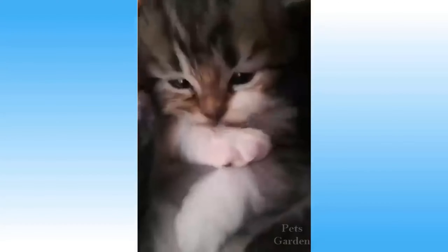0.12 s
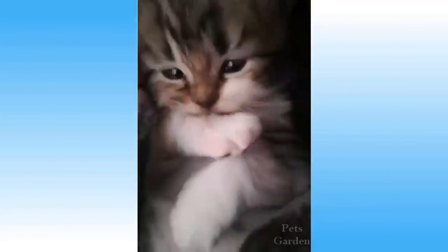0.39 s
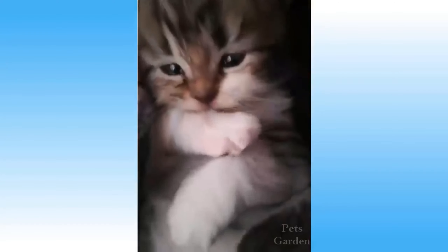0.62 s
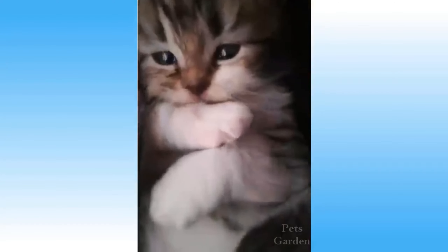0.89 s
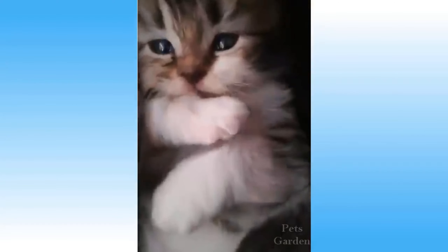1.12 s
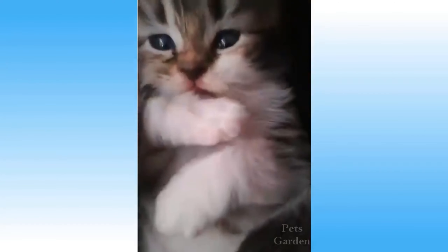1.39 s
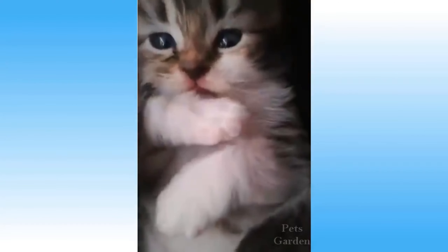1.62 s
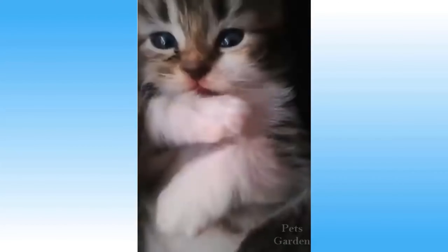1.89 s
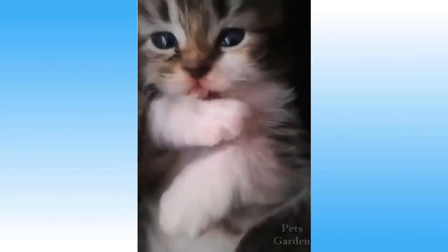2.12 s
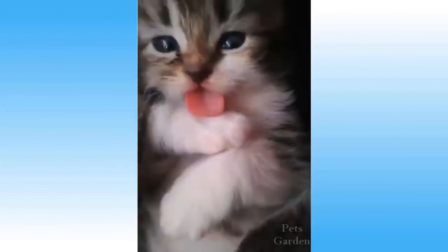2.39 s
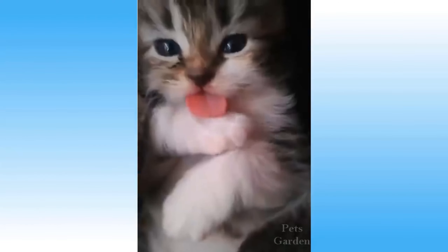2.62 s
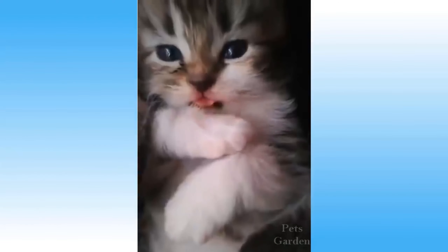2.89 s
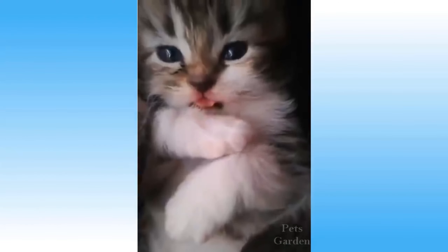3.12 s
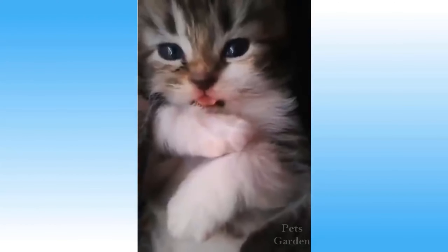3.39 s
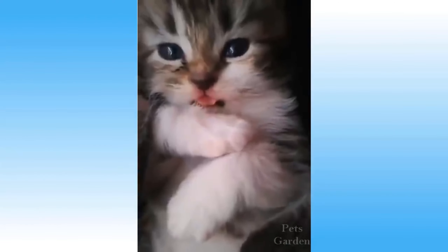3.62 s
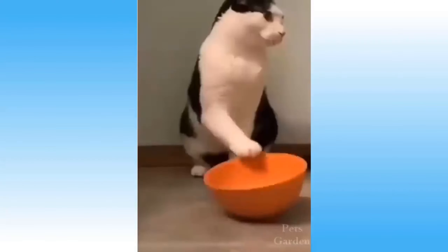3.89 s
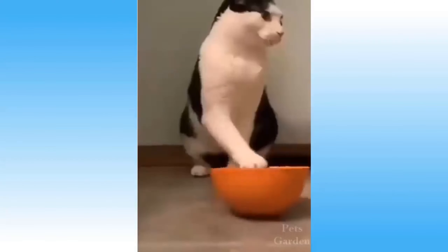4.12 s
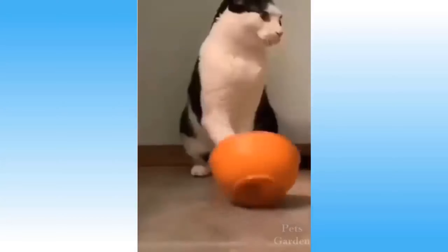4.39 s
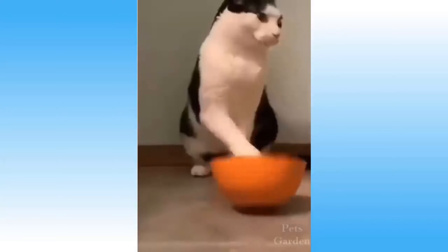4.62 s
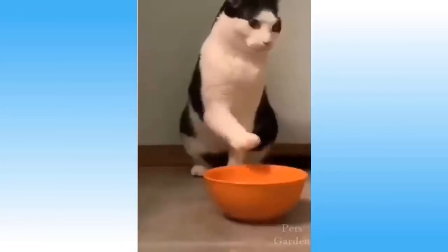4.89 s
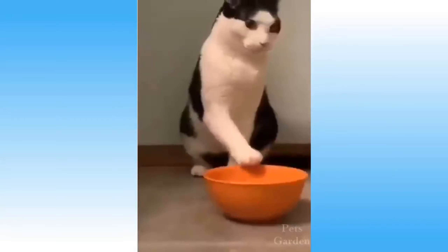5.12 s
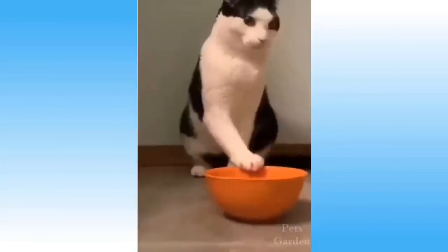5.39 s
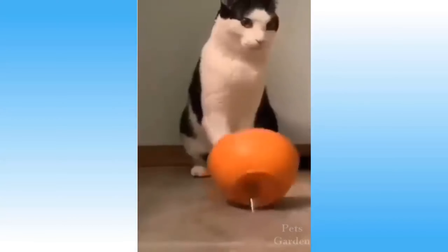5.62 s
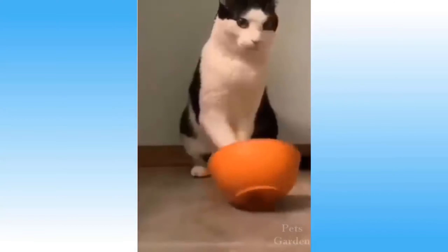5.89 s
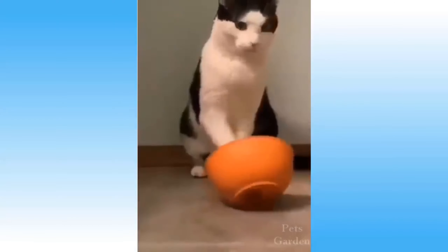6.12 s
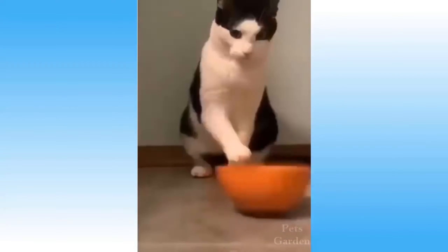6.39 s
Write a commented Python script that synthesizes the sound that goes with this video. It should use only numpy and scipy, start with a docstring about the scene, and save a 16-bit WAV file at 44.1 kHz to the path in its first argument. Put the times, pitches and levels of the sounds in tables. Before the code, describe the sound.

Close wet licks click over low room rumble and hiss, then after a brief silence a hollow plastic bowl scrapes, knocks and slams on a floor.

```python
"""Indoors, a quiet room and then a small bare one: two short scenes separated by a moment of silence.
First a kitten held close licks its lips: brief cavity resonances click on the left, a few snags click on the
right, and cloth rustles as noise in clumps. Room rumble and hiss lie below; the microphone starts with a thump.
Then a cat tips an empty plastic bowl: juddering noise drives its modes as it scrapes, and damped modes of hollow,
wall and floor sound as it knocks and bounces, with the room's decaying echoes."""
import sys
import numpy as np
from scipy import signal
from scipy.fft import rfft, irfft, next_fast_len
from scipy.io import wavfile
from scipy.ndimage import uniform_filter1d

SR = 44100
rng = np.random.default_rng(int(sys.argv[2]) if len(sys.argv) > 2 else 0)


def magnitude_from_level(level_db):
    """Linear magnitude for a level in decibels (20 dB per decade)."""
    exponent = np.asarray(level_db, float) / 20
    return 10 ** exponent


def unload_audio(sound):
    """Save the sound as a 16-bit wav file, at the path given as the first command line argument."""
    columns = np.transpose(np.atleast_2d(sound))
    # keep every value between -1 and 1, then stretch to whole-number steps
    steps = np.round(np.clip(columns, -1, 1) * 32767)
    wavfile.write(sys.argv[1], SR, steps.astype(np.int16))


N = 287091


def unit(x):
    """Power normalisation: scales a signal to rms 1."""
    return x / np.sqrt(np.mean(x ** 2) + 1e-20)


def along(points, hz):
    """Logarithmic frequency scale: interpolates (frequency, value) points."""
    f, v = np.transpose(points)
    return np.interp(np.log(hz + 1), np.log(f + 1), v)


def filtered(x, response):
    """Linear filtering: the spectrum is multiplied by a complex response of frequency."""
    size = next_fast_len(x.shape[-1] + 8192)
    spectrum = rfft(x, size) * response(np.fft.rfftfreq(size, 1 / SR))
    return irfft(spectrum, size)[..., :x.shape[-1]]


def noise(spectrum, size):
    """Spectral shaping: white noise is coloured and scaled to rms 1."""
    return unit(filtered(rng.standard_normal(size), lambda hz: magnitude_from_level(along(spectrum, hz))))


def add(track, s, sound):
    """Superposition: mixes a short sound into the track at time s."""
    start = round(s * SR)
    part = track[..., start:start + sound.shape[-1]]
    part += sound[..., :part.shape[-1]]


def ring(modes, t, attack, scatter_db):
    """Modal decay: a blow excites damped sines, each at a randomly scattered strength."""
    total = np.zeros(len(t))
    for hz, db, t60 in modes:
        decay = magnitude_from_level(db + scatter_db * rng.normal() - 60 * t / t60)
        total += decay * np.sin(2 * np.pi * hz * t)
    return (1 - np.exp(-t / attack)) * total


def placed(x, pan_db, left_lag_s):
    """Level and time differences: a near source is louder and earlier in the closer microphone port."""
    ear = np.array([[.5], [-.5]])
    delay_s = left_lag_s * ear + abs(left_lag_s) / 2
    return filtered(x, lambda hz: magnitude_from_level(pan_db * ear) * np.exp(-2j * np.pi * hz * delay_s))


# wet licks on the left and snags on the right: start_s, level_db (relative), pitch_hz, left_over_right_db
LICKS = [(2.2063, -35.5, 6160, 5), (2.3151, -37.5, 6560, 14), (2.373, -33.5, 7460, 7.5),
         (2.4084, -18, 8900, 11), (2.448, -23.5, 8700, 10), (2.8572, -29, 6600, 8.5),
         (2.8925, -15.5, 7360, 14), (2.9245, -23, 5170, 15), (3.464, -31, 7440, -17),
         (3.5205, -28.5, 8000, -21), (3.53, -36.5, 9130, -20), (3.5417, -34.5, 6500, -16)]
# bright part of the noise, for licks and rustle: frequency_hz, level_db (relative)
FIZZ = [(1500, -15.5), (3500, -6.5), (8000, -1), (12000, -5.5), (15500, -45.5)]


def licks():
    """Cavity resonance: a wet contact breaks, a tiny cavity rings for a few cycles, a spray of noise fades."""
    out, t = np.zeros((2, N)), np.arange(SR // 50) / SR
    for s, db, hz, pan_db in LICKS:
        cavity = [(hz, 0, .0022), (hz * .68, -3, .0025), (hz * 1.35, -8, .002)]
        pop = ring(cavity, t, attack=.00025, scatter_db=1.5)
        spray_level = np.clip(t / 0.00068, 0, 1) * magnitude_from_level(-15 - 60 * t / 0.013)
        spray = spray_level * noise(FIZZ, len(t))
        lag_s = -.0006 * np.sign(pan_db)
        add(out, s, magnitude_from_level(db + 5) * placed(pop + spray, pan_db, lag_s))
    return out


# cloth rubs, and the dull low body of the lick at 2.89 s:
# start_s, level_db (relative), treble_db (relative), length_s
RUSTLES = [(0.059, -39, -21, 0.012), (0.18, -43, -7.5, 0.06), (0.325, -46, -5, 0.084),
           (1.1, -43, -13, 0.015), (1.565, -40.5, -17, 0.019), (2.591, -38, -6.5, 0.039),
           (2.891, -31.5, -23, 0.021), (3.215, -37.5, -2, 0.023), (3.24, -35.5, -14, 0.021),
           (3.382, -35, -21, 0.05), (3.424, -32, -9.5, 0.056), (3.509, -30, -7, 0.041)]
# duller body of the noise: frequency_hz, level_db (relative)
DULL_BODY = [(80, -25), (200, -2), (800, 4), (1600, -9.5), (5000, -20.5)]


def cloth_and_lick_body():
    """Stick-slip friction: fibres slip in clumps, nearer the right port; one such burst is a lick's dull body."""
    out, t = np.zeros((2, N)), np.arange(SR // 8) / SR
    for s, db, treble_db, length in RUSTLES:
        stroke = np.clip(t / .004, 0, 1) * np.exp(-(t / length) ** 3)
        wander = unit(uniform_filter1d(rng.standard_normal(len(t)), size=50))
        clumps = stroke * magnitude_from_level(4.5 * wander)
        clumps *= np.linalg.norm(stroke) / np.linalg.norm(clumps)  # keeps the energy of the stroke
        fizz = magnitude_from_level(treble_db - 3.0) * noise(FIZZ, len(t))
        rustle = clumps * (noise(DULL_BODY, len(t)) + fizz)
        # the rustle is band-limited: it fades above about 13 kHz
        rustle = filtered(rustle, lambda hz: 1 / (1 + (hz / 13500) ** 12))
        add(out, s, magnitude_from_level(db - 7.0) * placed(rustle, pan_db=-12.5, left_lag_s=.00063))
    return out


def start_thump(t):
    """Exponential discharge: the microphone starts with a jump whose offset drains away."""
    drain = magnitude_from_level(-17) * np.exp(-np.abs(t) / .11)
    onset = 1 + [[.4], [-1]] * np.exp(-np.abs(t) / .00025)  # differs between left and right
    jump = drain * onset * (t > 0)
    return -filtered(jump, lambda hz: 1 / (1 + 1j * hz / 5000) ** 2)


# reverberation time of the bare room: frequency_hz, t60_s
ROOM = [(100, 0.75), (400, 0.38), (2000, 0.4), (10000, 0.35)]


def tail(size):
    """Reverberant decay: uneven echoes build up, each frequency dies at its own speed; sum energy is 1."""
    wander = unit(uniform_filter1d(rng.standard_normal(size), size=120))
    echoes = rng.standard_normal((2, size)) * magnitude_from_level(2.5 * wander)
    hz, t, z = signal.stft(echoes, SR, nperseg=256)
    decay = magnitude_from_level(-60 * t / along(ROOM, hz)[:, None])
    answer = signal.istft(z * decay, SR, nperseg=256)[1]
    answer = answer * np.clip(np.arange(answer.shape[1]) / SR / 0.0096, 0, 1) ** 2
    return answer / np.linalg.norm(answer[0])


def in_room(direct, spread):
    """Convolution: direct sound plus the room's answer to what spreads, for the ports' sum and difference."""
    wet = magnitude_from_level(-2.5) * signal.fftconvolve(spread[None], tail(SR // 2), axes=1)
    return wet + np.pad(direct, (0, wet.shape[1] - len(direct)))


# light taps and bounces of the rocking bowl: start_s, level_db (relative), hollow_pitch_hz,
# flatness (0 on the rim, 1 on the base), floor_thud_db (relative to the hollow)
TAPS = [(4.0148, -46.5, 886, 0.18, -6), (4.231, -25.5, 900, .2, -3), (4.257, -21.5, 960, 0.22, -5),
        (4.412, -22, 900, .53, -9.5), (4.932, -27, 860, 0.17, -11), (4.947, -34, 880, 0.42, -10.5),
        (4.956, -29.5, 860, 0.21, -3.5), (5.075, -26.5, 895, .05, -5), (5.0906, -31, 960, 0.21, -4),
        (5.103, -31.5, 920, .9, -6), (6.152, -10.5, 860, 0.18, -16.5), (6.434, -31.5, 900, 0.85, 1.5)]
# the dropped bowl lands edge first, then flat: base_start_s, base_level_db (relative), hollow_pitch_hz,
# edge_lead_s, edge_level_db (relative)
SLAMS = [(4.3953, -17, 750, 0.0057, -20), (4.5802, -3.5, 925, 0.0036, -17), (5.2800, -4, 960, .0052, -13),
         (5.439, -0.5, 965, 0.0049, -14)]
# how each part of a landing rings: flatness (0-1), then wall_db, floor_thud_db, crack_db (relative to the hollow)
EDGE = (0.524, -7, -25.5, -20)
BASE = (0.74, -28, -35, -24.5)


def contacts():
    """Impact sequence: every touch as (s, dB, Hz, flatness, wall dB, thud dB, crack dB)."""
    touches = []
    for s, db, hz, flat, thud_db in TAPS:
        touches.append((s, db, hz, flat, -13, thud_db, -28.5))
    for s, db, hz, lead_s, edge_db in SLAMS:
        touches.append((s - lead_s, edge_db, 900, *EDGE))
        touches.append((s, db, hz, *BASE))
    return touches


# modes of the plastic wall, for knocks and scrapes: frequency_hz, level_db (relative), t60_s
WALL = [(1380, 0, .025), (1750, -2, .02), (1950, -3, .02)]
# belly modes that ring with the hollow: frequency_hz, level_db (relative, on a flat base), t60_s
BELLY = [(532, -10, 0.029), (693, 2, 0.013), (1125, -5.5, 0.014)]
# boom of the floor boards: frequency_hz, level_db (relative), t60_s
BOARDS = [(101.5, -1, 0.067), (150.7, -4, 0.096), (257, -7.5, 0.092)]
# colour of the contact noise: frequency_hz, level_db (relative)
CRACK = [(2000, -18), (3300, 9.5), (6500, 1.5), (12000, -3)]


def knocks():
    """Modal excitation: each contact rings the hollow (pitch follows the tilt), the wall and the floor boards."""
    out, t = np.zeros((2, N)), np.arange(SR // 4) / SR
    for s, db, hz, flat, wall_db, thud_db, crack_db in contacts():
        # the floor damps a flat base and shakes its belly; a tap on the rim lets the hollow sing
        hollow = ring([(hz, 0, 0.031 * 0.45 ** flat)], t, attack=0.00045, scatter_db=2.0)
        belly = magnitude_from_level(-18 * (1 - flat)) * ring(BELLY, t, attack=.0006, scatter_db=1.5)
        wall = magnitude_from_level(wall_db) * ring(WALL, t, attack=.0006, scatter_db=2.5)
        thud = magnitude_from_level(thud_db) * ring(BOARDS, t, attack=.006, scatter_db=2.5)
        crack_level = (1 - np.exp(-t / 0.00098)) * magnitude_from_level(crack_db - 60 * t / 0.027)
        rest = belly + thud + crack_level * noise(CRACK, len(t))
        # a tilted bowl beams its hollow at the microphone, less at the walls
        spread_hollow = magnitude_from_level(-9.5 * (1 - flat)) * hollow
        spread_wall = magnitude_from_level(-4.5) * wall  # the wall modes reach the room weaker than the microphone
        knock = in_room(hollow + wall + rest, spread_hollow + spread_wall + rest)
        add(out, s, magnitude_from_level(db + 4.5) * knock)
    return out


# rim dragging, one entry a stroke: wall_over_hollow_db, then a list of
# time_s, rumble_level_db (relative), hollow_level_db (relative)
STROKES = [(-13.5, [(4.05, -65, -58), (4.068, -42, -51), (4.14, -59, -55.5), (4.225, -45.5, -41),
           (4.255, -44, -48)]), (-11.5, [(4.98, -63, -60), (5.03, -59, -53.5), (5.074, -60.5, -54.5)]),
           (2, [(6.06, -81, -78), (6.08, -58, -57), (6.11, -48.5, -61), (6.15, -50, -60)])]
# colour of the dragging rumble: frequency_hz, level_db (relative)
SCRAPE_TONE = [(60, -26.5), (150, 3.5), (500, 0), (1100, -15.5), (3500, -21.5), (8000, -34)]


def scrape():
    """Friction-driven resonance: as the paw tips the bowl its rim judders, and slips make hollow and wall sing."""
    out, life = np.zeros((2, N)), np.arange(SR // 20) / SR
    for wall_db, rows in STROKES:
        s, rumble_db, sing_db = np.transpose(rows)
        t = np.arange(s[0], s[-1], 1 / SR)
        judder = magnitude_from_level(3.5 * unit(uniform_filter1d(rng.standard_normal(len(t)), size=150)))

        def sing(modes):
            """Resonance: random slips, stronger and weaker with the judder, drive the modes."""
            slips = judder * rng.standard_normal(len(t))
            return signal.fftconvolve(slips, ring(modes, life, attack=.0004, scatter_db=0))[:len(t)]

        rumble = judder * noise(SCRAPE_TONE, len(t))
        hollow = sing([(940, 0, 0.018)])
        wall = sing(WALL)
        drag = magnitude_from_level(np.interp(t, s, rumble_db)) * unit(rumble)
        drag += magnitude_from_level(np.interp(t, s, sing_db)) * unit(hollow)
        drag += magnitude_from_level(np.interp(t, s, sing_db + wall_db)) * unit(wall)
        add(out, s[0], in_room(drag, drag))
    return out


def air(spectrum, alike, patchy_db):
    """Partial coherence: stereo noise of rms 1, patchy in gain; the ports agree by frequency."""
    z = signal.stft(rng.standard_normal((2, N)), nperseg=512)[2]
    field = uniform_filter1d(rng.standard_normal(z.shape[1:]), size=7, axis=0)
    field = uniform_filter1d(field, size=10, axis=1)
    treble = np.clip(np.arange(len(field)) / 12, 0, 1)[:, None]  # the bass stays even
    patches = magnitude_from_level(patchy_db * unit(field) * treble)
    pair = signal.istft(z * patches, nperseg=512)[1][:, :N]

    def mid_side(hz):
        """Coherence angle: shares the spectrum between sum and difference."""
        turn = np.arccos(np.clip(along(alike, hz), -1, 1)) / 2
        return magnitude_from_level(along(spectrum, hz)) * [np.cos(turn), np.sin(turn)]

    mid, side = filtered(pair, mid_side)
    return unit(np.array([mid + side, mid - side]))


# rumble and hiss of the first room: frequency_hz, density_db (relative, per Hz)
NEAR_AIR = [(15, -38), (30, -7.5), (49, -0.5), (75, -12), (160, -14), (280, -20.5), (400, -20), (570, -27),
            (1300, -31), (2200, -35), (10000, -42.5), (12800, -48), (14000, -84.5)]
# left-right likeness of that noise: frequency_hz, correlation (-1 to 1)
NEAR_ALIKE = [(100, 1), (290, 0.77), (640, -0.57), (1400, 0.082)]


def near_room():
    """Stationary noise floor: room rumble and microphone hiss of the first scene."""
    return magnitude_from_level(-46) * air(NEAR_AIR, NEAR_ALIKE, patchy_db=2.5)


# noise of the second room: frequency_hz, density_db (relative, per Hz)
FAR_AIR = [(15, -48), (25, -13.5), (61, -3.5), (319, -22.5), (4990, -38.5), (6000, -34.5), (7800, -63.5),
           (13200, -120)]


def far_room():
    """Stationary noise floor: the fainter noise of the second scene, alike in the bass only."""
    return magnitude_from_level(-71) * air(FAR_AIR, [(100, 0.99), (1000, .2)], patchy_db=4.0)


# span of the first scene: start_s, end_s
FIRST_S = (.0395, 3.868)


def kitten():
    """Superposition: licks, rustle, starting thump and room noise make the first scene."""
    t = np.arange(N) / SR - FIRST_S[0]
    sound = licks() + cloth_and_lick_body() + start_thump(t) + near_room()
    return sound * ((t > 0) & (t < FIRST_S[1] - FIRST_S[0]))


# sum of the two ports, notched where they cancel: frequency_hz, gain_db
PORT_SUM = [(40, -9.5), (80, -1), (2100, -1.5), (2700, -7.5), (3300, 4.5), (4100, -5), (4900, -18),
            (5800, 3), (7600, -2), (9500, -16), (12000, -22), (15000, -53)]
# difference of the two ports: frequency_hz, gain_db
PORT_DIFFERENCE = [(60, -40), (200, -25.5), (700, -11.5), (2000, -7.5), (5500, 6.5), (7000, -21)]


def cat():
    """Port interference: arrival times differ, so the difference is a quarter turn of phase from the sum."""
    mid, side = knocks() + scrape()
    mid = filtered(mid, lambda hz: magnitude_from_level(along(PORT_SUM, hz)))
    side = filtered(side, lambda hz: 1j * magnitude_from_level(along(PORT_DIFFERENCE, hz)))
    sound = np.array([mid + side, mid - side]) + far_room()
    second_start_s = 4.012
    return sound * (np.arange(N) / SR > second_start_s)


def scene():
    """Succession: the kitten's scene, then the cat's."""
    return kitten() + cat()


def top_cut(x):
    """Nothing passes above the cut-off."""
    return signal.sosfilt(signal.butter(12, 16540, fs=SR, output="sos"), x)


def record(dry):
    """Saturation: the converter clips at full scale."""
    mix = np.clip(dry, -1, 1)
    return top_cut(mix)


dry = scene()
out = record(dry)
unload_audio(out)
```